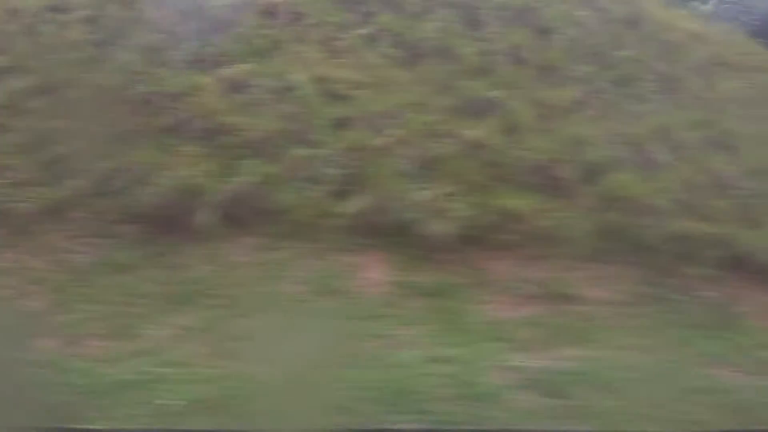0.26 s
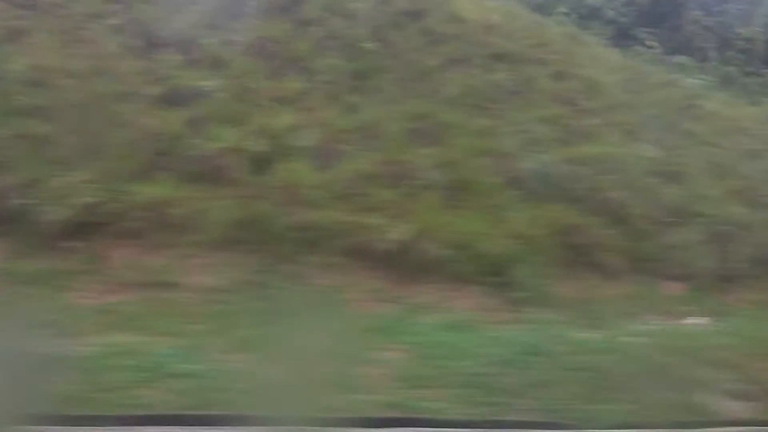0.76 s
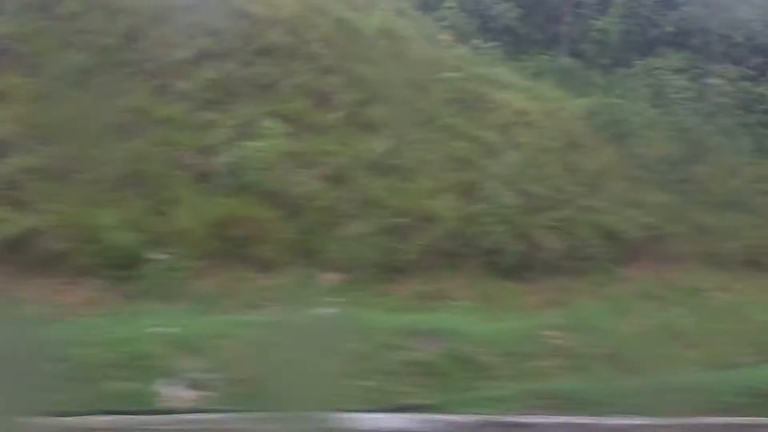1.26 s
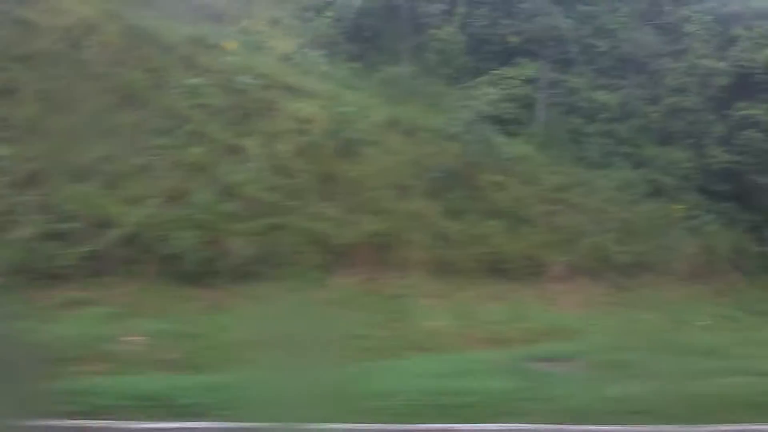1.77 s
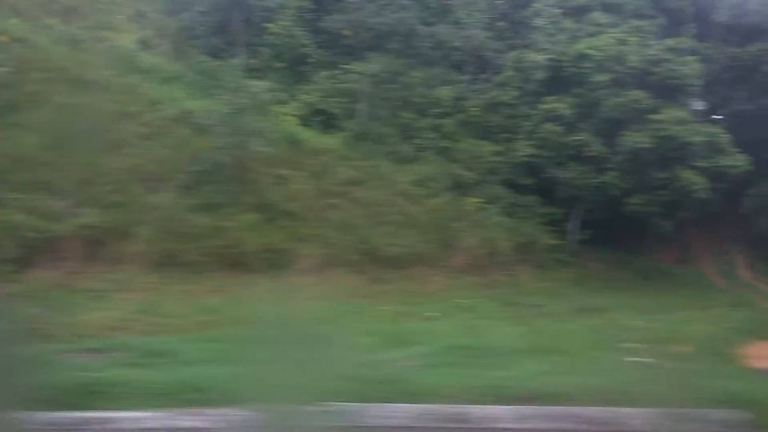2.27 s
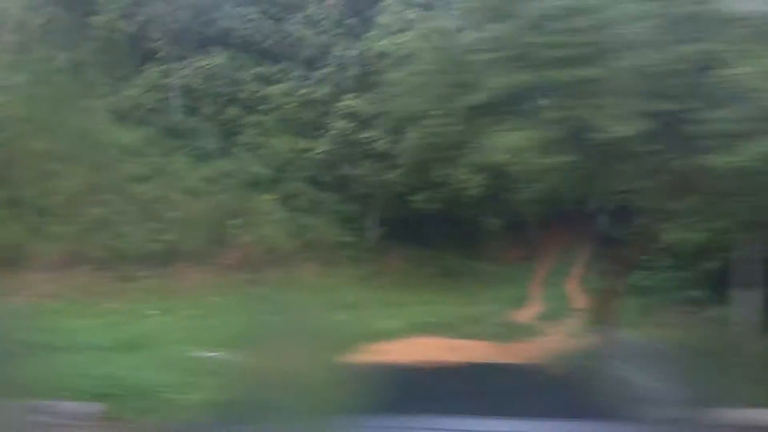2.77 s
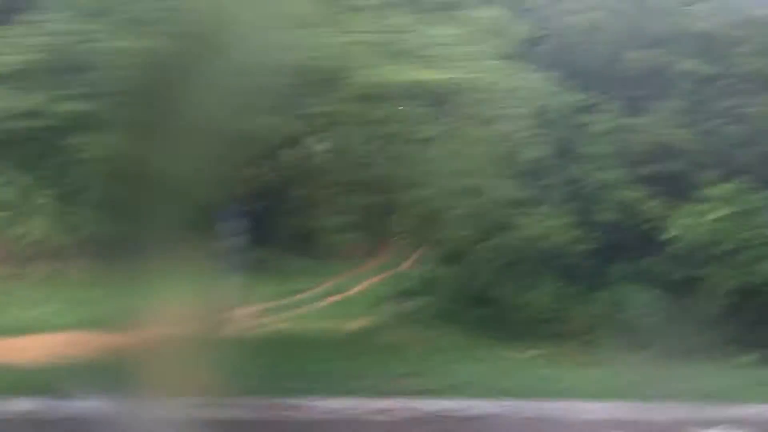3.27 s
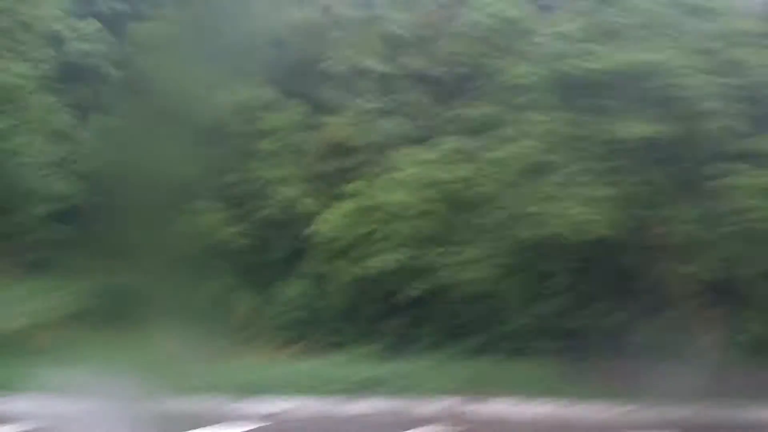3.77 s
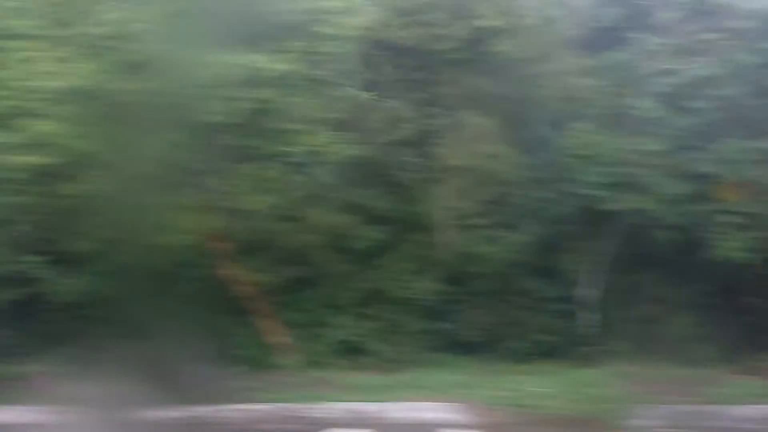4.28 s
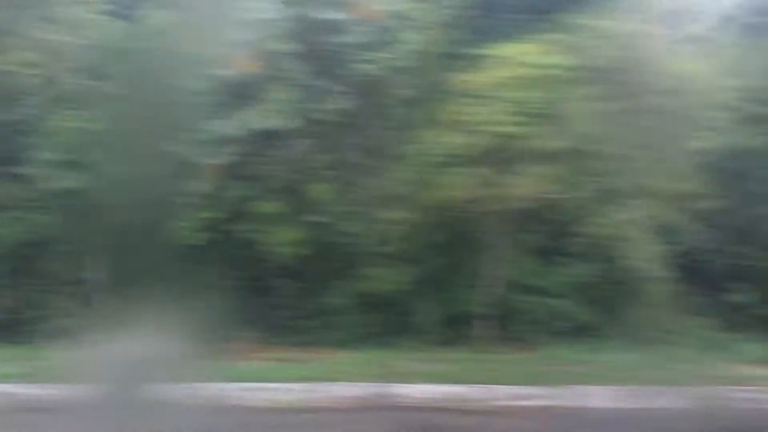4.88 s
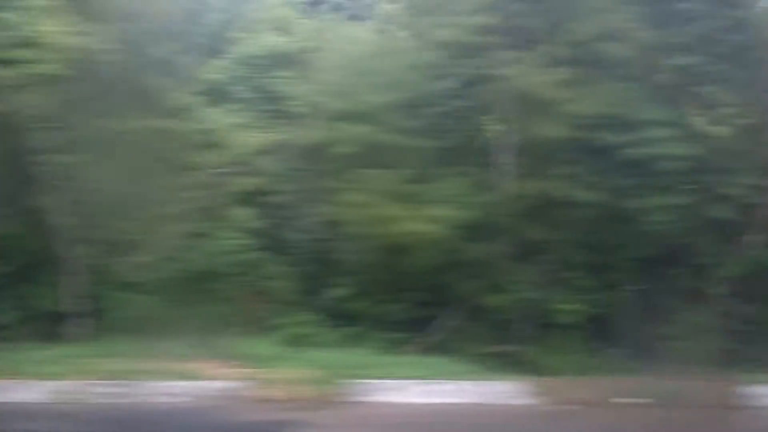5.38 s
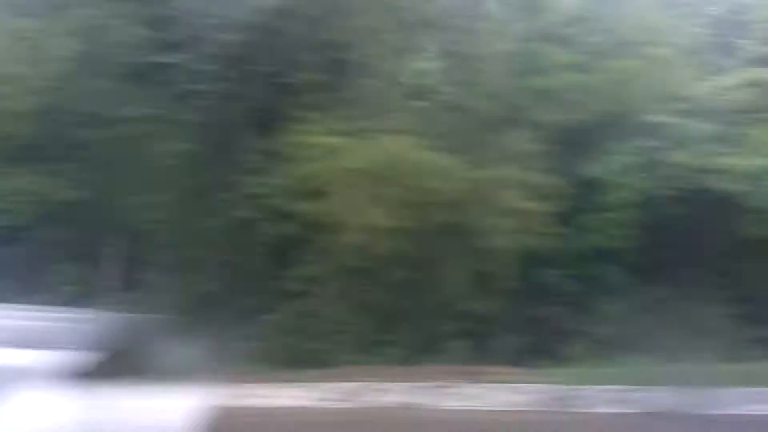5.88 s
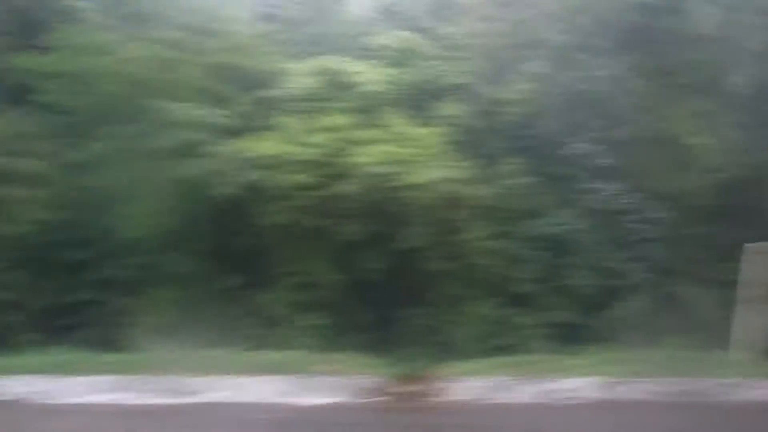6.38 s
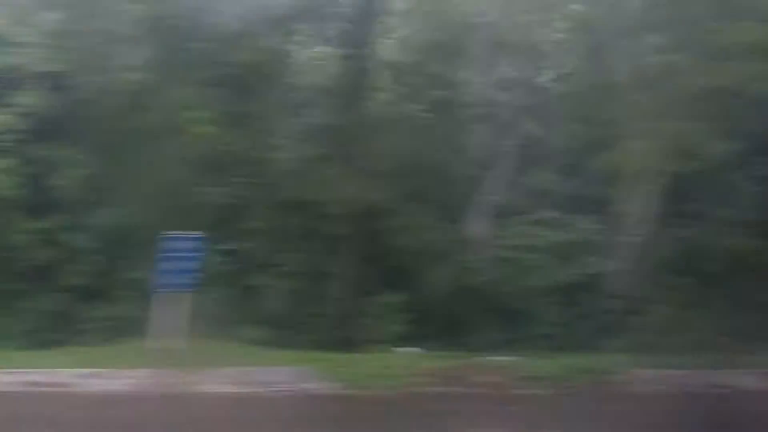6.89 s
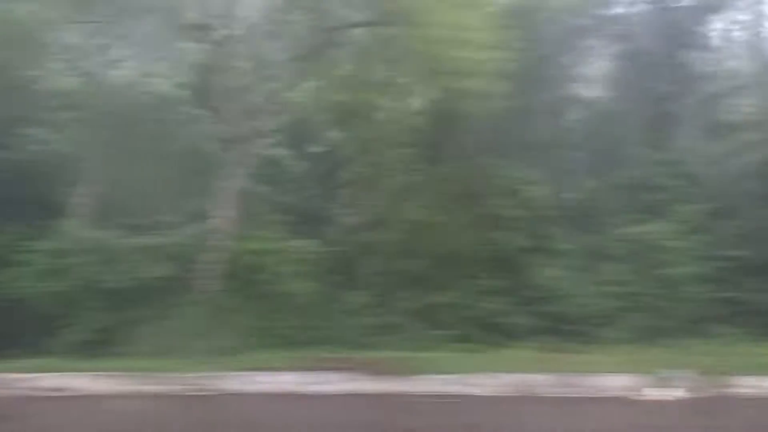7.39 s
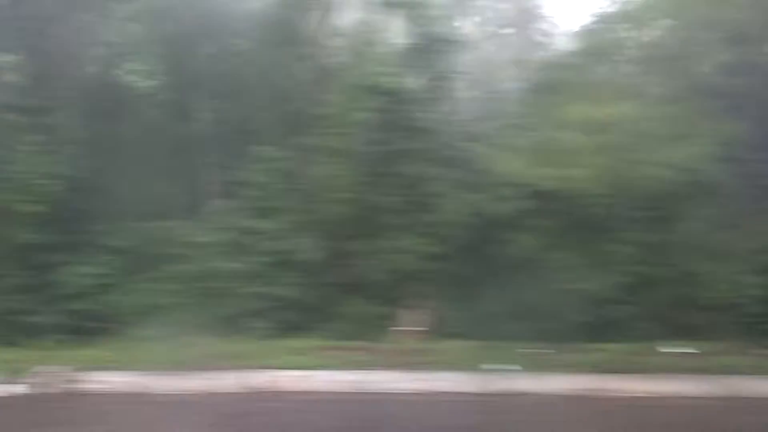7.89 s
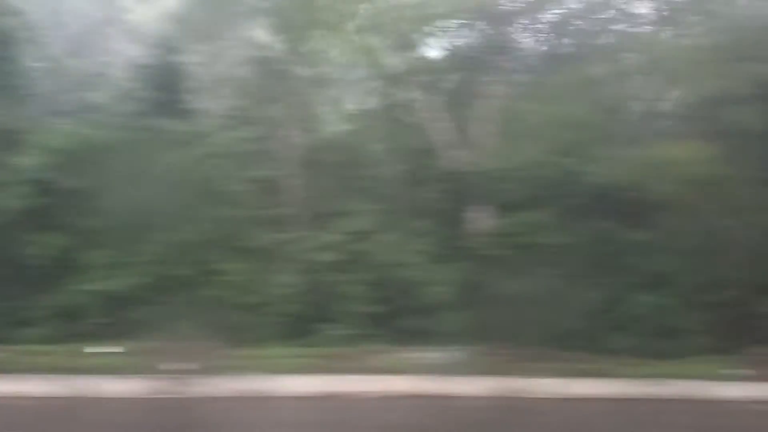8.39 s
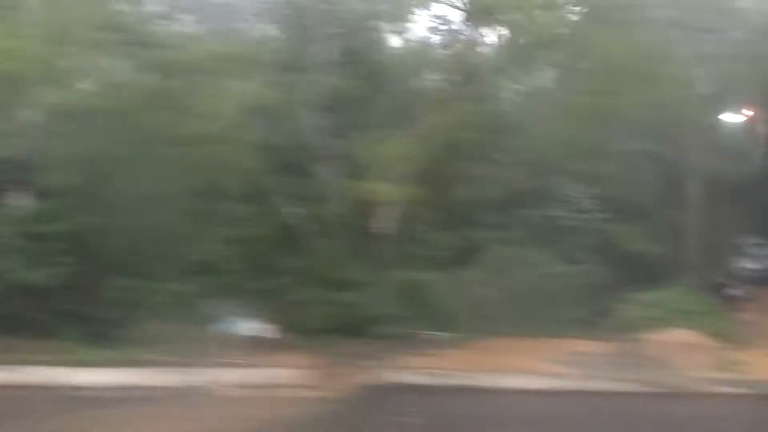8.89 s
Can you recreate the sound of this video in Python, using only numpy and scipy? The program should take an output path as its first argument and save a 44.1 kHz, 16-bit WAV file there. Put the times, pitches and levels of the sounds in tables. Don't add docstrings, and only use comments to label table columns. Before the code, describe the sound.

Steady droning cabin hum and wet tyre rush, light rain ticks on glass, bumps, spray swells, and clicks and thuds of a handheld microphone.

```python
import sys
import numpy as np
from scipy import signal
from scipy.fft import rfft, irfft, next_fast_len
from scipy.io import wavfile
from scipy.ndimage import uniform_filter1d

SR = 44100
rng = np.random.default_rng(int(sys.argv[2]) if len(sys.argv) > 2 else 0)


def digitize_waveform(pressure):
    field = np.atleast_2d(pressure).T
    bounded = np.clip(field, -1, 1)
    quanta = np.round(bounded * 32767).astype(np.int16)
    wavfile.write(sys.argv[1], SR, quanta)


def invert_db(level):
    return 10 ** (np.asarray(level, dtype=float) / 20)


N = 402633
T = np.arange(N) / SR
SIZE = next_fast_len(N)
F = np.arange(SIZE // 2 + 1) * SR / SIZE

# time in seconds, wheel turns per second.
WHEEL_SPEED = [(0, 9.82), (1, 10.05), (2, 10.22), (2.4, 10.32), (4.1, 10.32), (5, 10.4), (5.5, 10.42),
               (7, 10.56), (9.13, 10.92)]
# time in seconds, low tone in dB, high tone in dB, engine load in dB.
HUM = [(0, -26, -32, 8.5), (.3, -28, -29, 0), (1, -28.5, -37, 8.5), (1.5, -24.5, -34, 3.5),
       (2, -28, -26.5, 4), (2.5, -26.5, -25, 5), (3, -29, -30.5, 2.5), (3.5, -36.5, -34.5, -2.5),
       (4, -37, -30, -6), (4.5, -26, -36.5, -1.5), (5, -26.5, -24, 5.5), (5.5, -25.5, -22, 5.5),
       (6, -23.5, -29.5, 6), (6.5, -36.5, -25, 8), (7, -25, -26.5, 9), (7.6, -25.5, -33.5, 10.5),
       (8.5, -26, -37, 11), (9.13, -22.5, -28, 13.5)]
ORDERS = (6, 9, 11, 12, 14, 15, 16, 17, 20, 24, 30, 36)
ORDER_DB = (-48, -49, -54.5, -40.5, -40, -40.5, -37.5, -46.5, -52.5, -42.5, -51, -51)
ORDER_SWELLS = {24: [(4.8, 3), (5.3, 4), (5.85, 7), (6.45, 3), (6.9, 6), (7.2, 8), (8.1, -8), (8.7, -7)],
                36: [(3.8, 6), (5.5, 12), (5.8, 11), (7.13, 10), (7.85, 12), (8.2, 4)]}
# time in seconds, rise in dB, width in seconds.
GEAR_PEAK = (8.95, 3.2, .05)
# time in seconds, roughness in dB.
ROUGHNESS = [(0, -32.5), (.1, -34.5), (.9, -32), (1.5, -34.5), (1.9, -36.5), (2.5, -35), (2.8, -35.5),
             (3.3, -36), (4.4, -35.5), (4.8, -34), (5.45, -32), (5.7, -34.5), (6.0, -33.5), (6.7, -34),
             (7.3, -33.5), (7.7, -33), (8.3, -33.5), (9.13, -30.5)]
ROAD_CENTRES_HZ = (110, 320, 900, 4000)
# frequency in Hz, density in dB per Hz.
ROAD_COLOUR = [(25, -32.5), (60, -20.5), (130, -10), (220, -12), (400, -23), (600, -21), (1100, -30),
               (1500, -38), (2500, -43), (5000, -55.5), (8500, -53), (10500, -54), (12000, -65.5),
               (15200, -59)]
# frequency in Hz, gain in dB, width in octaves.
PANELS = [(300, 2, 0.032), (392, 4, 0.042), (500, 4, 0.034), (557, 4, 0.067), (642, 3.5, 0.039),
          (900, 3, 0.044), (1057, 3.5, 0.034), (1275, 2.5, 0.05), (2060, 2, 0.1), (4640, 1.5, 0.092),
          (5160, 3, .06)]
# frequency in Hz, shared over own in dB, left minus right in dB.
PORTS = [(40, 20, 0.5), (130, 14.5, 1.5), (320, 0.5, 0.5), (600, 5, 1), (1160, -3, 4.5), (1700, -23, -1),
         (2770, -0.5, 7), (3150, -22, 3), (3760, -13, 11), (4900, 8, -20), (5760, -40, 9), (6900, 15, -17),
         (8800, 3, 1), (12000, -23, -1)]
# frequency in Hz, level in dB.
STRAY = [(300, -23.5), (1200, -9), (2500, -29), (5000, -13), (7500, -12), (12000, 2.5)]
# time in seconds, boom in dB, share reaching the roar (0-1).
BUMPS = [(.25, 8.5, 0.24), (.71, 7.5, 0), (1.17, 5, 0.31), (1.36, 2, 0), (1.68, 6.5, 0.8), (2.63, 4, 0.7),
         (3.14, 12, 0.12), (3.48, 10, 0.19), (4.06, 5, 0.2), (4.2, 1, 0.6), (4.36, 5.5, 0), (4.73, 6, 0.04),
         (5.83, 5.5, 0.42), (6.48, 1, 0), (6.95, 4.5, 0.6), (7.53, 2.5, 0.3), (7.75, 3, 0.2),
         (7.92, 3.5, 0.8), (8.1, 1, 0.02), (8.4, 3.5, 0.02), (8.7, 0.5, 0.04), (9.05, 5, 0.36)]
# time in seconds, rise in dB.
PATCHES = [(.61, -0.5), (.91, 1), (1.09, 2), (1.56, 2.5), (1.65, 0), (1.75, 0), (2.21, 3), (2.66, 3),
           (3.18, 4.5), (4.33, 2.5), (5.28, 5), (5.77, 1.5), (6.23, 2), (6.43, 2), (7.07, 3), (7.46, 2),
           (7.66, 1.5), (7.79, 3.5), (8.02, 5), (8.21, 3.5), (8.55, 3), (8.65, 1.5), (8.87, 0)]
# time of the middle in seconds, rise in dB.
SPLASHES = [
    (.4, -2),
    (2.3, 1.5),
    (3.13, 3.5),
    (3.5, 2),
    (4.4, 1.5),
    (5.85, 0.5),
    (6.45, 2),
    (6.79, 2),
    (7.62, -0.5),
    (8.95, 1),
]
# time in seconds, rise in dB, width in seconds, centre in Hz.
WET_STRETCH = (5.83, 2.8, 0.72, 2540)
# start in seconds, peak in dB.
DROPS = [(0.2994, -35), (0.348, -37), (0.68, -35), (1.0301, -42), (1.608, -41), (1.6455, -36), (2.814, -40),
         (3.1213, -37), (3.2545, -40), (3.4416, -38), (3.4855, -45), (3.5644, -38), (3.6596, -42),
         (4.5024, -36), (4.5296, -41), (4.569, -40), (4.9707, -45), (4.997, -40.5), (5.0843, -51),
         (5.337, -44), (5.7982, -41), (5.91, -45), (6.54, -49), (6.8733, -44), (6.9955, -41), (7.0976, -32),
         (7.7554, -44), (8.0835, -37), (8.2078, -37), (8.993, -38)]
# start in seconds, peak in dB.
PATTER = [(4.6118, -46), (4.6951, -47), (4.7101, -45), (4.7505, -51), (4.7904, -47), (4.8602, -51),
          (4.9251, -43), (4.95, -43), (4.97, -42), (4.9969, -42), (5.0757, -44), (5.0842, -41),
          (5.1052, -43), (5.2603, -42), (5.3357, -43), (5.401, -41), (5.4299, -43), (5.4833, -44),
          (5.5991, -57), (5.7407, -50), (5.7981, -46), (5.861, -43), (5.8949, -47), (5.9104, -42),
          (5.9902, -46), (6.045, -44), (6.061, -41), (6.2301, -50)]
# start in seconds, peak in dB.
SCATTERED_DROPS = [(0.0453, -44), (0.4733, -46), (0.7402, -42), (1.0046, -46), (1.284, -45), (2.0612, -45),
                   (2.5406, -44), (2.7137, -45), (3.0525, -44), (3.3877, -42), (3.8511, -45), (4.369, -43),
                   (6.5909, -47), (6.776, -47), (6.8104, -43), (6.8453, -41), (6.8543, -39), (6.9501, -43),
                   (7.5612, -41), (7.9154, -41), (8.0112, -43), (8.1549, -41), (8.2771, -46), (8.308, -43),
                   (8.3409, -43), (8.3903, -43), (8.5679, -41), (8.6213, -46), (8.7246, -42), (8.774, -43),
                   (8.9494, -41), (9.0818, -44), (9.1102, -41)]
# start in seconds, peak in dB, treble against peak in dB, hollow body in dB.
TICKS = [(0.299, -11.5, -25, -20), (0.338, -41, -22, 0), (0.3479, -16.5, -21, -4), (1.1882, -37, -19, -1),
         (1.61, -42, -2, -6), (1.6455, -34, -14, -1), (1.647, -32.5, -6, 2), (1.649, -36, -18, -7),
         (1.736, -38, -10, 0), (3.215, -39, -22, -1), (3.4206, -45, -14, 2), (3.4865, -31, -15, 2.5),
         (3.634, -39, -11, 0), (3.6609, -22, -23, 2.5), (3.674, -32.5, -20, 1), (3.7718, -40.5, -19, 1),
         (3.8213, -24.5, -43, 4), (3.9265, -36, -18, 6), (3.93, -29.5, -17, -3.5), (3.8686, -36, -26, -5),
         (1.1702, -39, -25, -5), (3.1038, -40, -18, 0), (3.1916, -37, -20, -2), (3.4037, -44, -20, -4),
         (3.5957, -42, -20, -5), (1.719, -41, -18, 2), (4.4997, -42, -18, -4), (4.5306, -28.5, -18, 0),
         (3.8179, -33, -20, 5), (3.832, -30, -20, -9), (4.527, -33.5, -18, 2), (4.5317, -28, -25, -2),
         (6.523, -36, -14, -6), (3.549, -45, -11, 3), (6.5406, -27.5, -15, -3), (6.5428, -39, -20, 10),
         (6.5597, -33, -28, -3), (6.9122, -22.5, -24, -3), (7.7553, -41, -2.5, -8), (8.7024, -43, -10, 0),
         (8.726, -46, -8, -3), (8.916, -41.5, -8, -4), (8.993, -36.5, -1.5, 6), ]
# frequency in Hz, level in dB, t60 in seconds.
TICK_MODES = [(1340, -3.5, 0.0095), (2330, 7.5, 0.0029), (3780, 7, 0.00041), (4160, 1.5, 0.00092)]
# frequency in Hz, level in dB, t60 in seconds.
CRACK_MODES = [(6200, -4, 0.00074), (8300, 1, 0.0008), (12100, -6, .001)]
# start in seconds, peak in dB.
LIGHT_TOUCHES = [
    (0.2118, -33),
    (0.6325, -36),
    (0.9013, -36),
    (2.6737, -34),
    (4.1584, -37),
    (4.323, -30),
    (4.7813, -33),
    (6.3163, -33),
]
# start in seconds, peak in dB, frequency in Hz.
THUMPS = [(.3, -21, 150), (.43, -16, 500), (.607, -19, 500), (3.774, -26, 500), (8.246, -9.5, 430),
          (1.526, -9, 200), (1.561, -13, 250), (1.605, -26, 151), (1.642, -5, 130), (3.125, -29, 110),
          (3.216, -22, 250), (3.486, -16, 400), (3.660, -14, 400), (3.673, -15, 300), (.347, -12, 450),
          (6.911, -14, 450), (3.821, -4.5, 177), (3.931, -15, 200), (4.529, -12, 110), (6.542, -10, 410),
          (3.926, -23, 500)]
# start in seconds, length in seconds, level in dB, treble against level in dB.
SCUFFS = [(0.302, 0.021, -44, 0), (0.669, 0.023, -40, 3), (0.74, 0.012, -45, 2), (1.033, 0.12, -46.5, 7.5),
          (1.606, 0.031, -39, 4), (1.643, 0.0096, -26.5, -2), (1.659, 0.026, -42, 2),
          (1.734, 0.022, -38, 2), (2.556, 0.23, -54, 2.5), (3.12, 0.024, -44.5, 5.5),
          (3.255, 0.013, -44, 5.5), (3.418, .02, -46, -6), (3.442, .015, -42, 3), (3.564, 0.017, -43, 2),
          (3.668, 0.0065, -39, 0), (3.773, .012, -39, -1), (3.783, 0.096, -45, 5), (3.817, 0.0099, -30, -4),
          (3.923, 0.008, -39, 0), (4.5, 0.023, -39, 0), (4.531, 0.022, -43, -4), (4.572, .02, -48, 6),
          (6.773, 0.081, -43, -3), (6.977, 0.052, -32.5, -1.5), (6.986, 0.028, -30.5, 2.5),
          (7.098, 0.014, -49, 4), (7.577, 0.14, -43.5, 7), (7.624, .07, -45, 4), (7.924, 0.21, -49, 6),
          (8.079, 0.021, -47, 6), (8.212, 0.043, -48, 2), (8.766, 0.12, -44.5, 6), (8.808, .07, -44.5, 6),
          (8.993, 0.002, -40, 3)]
# from Hz, to Hz.
SCUFF_BANDS_HZ = [(2300, 3800), (5300, 10000)]
RUB_BANDS_HZ = [(3200, 5000), (5400, 9200)]
# frequency in Hz, level in dB.
WHINE = [(9000, -74), (11000, -80), (13000, -58), (14000, -69), (15000, -57.5)]
BUSY_AT_S = (.02, .43, 1.0, 1.1, 1.27, 2.03, 4.69, 4.92, 5.0, 5.08, 5.38, 5.6, 5.79, 5.89, 6.03, 6.31, 6.83,
             7.21, 8.31, 8.91, 9.01)
# frequency in Hz, gain in dB.
LEFT_DULL = [(7000, -1), (9000, -4), (10500, -16), (13000, -23), (15000, -42)]
# step time in seconds, step in dB.
DUCK = [
    (0.307, -7),
    (9.028, -6),
]

BOOM_ORDER, GEAR_ORDER, FADING_ORDER = 18, 47.4, 30
FADING_DB, FADING_S = 12.5, 1
SLIP_HZ, SLIP_START_TURNS, SLIP_RISE_HZ_PER_S, PULL_S = 3.86, -.12, .09, 4.2
GEAR_DB, GEAR_RISE_DB_PER_S, GEAR_FLUTTER_DB, GEAR_WOBBLE_RAD = -49, 1.5, 2.2, .7
ORDERS_PER_LOAD, RUMBLE_PER_LOAD, BOOM_PER_LOAD = 0.43, 0.28, 0.039
SWELL_S, BUMP_S, PATCH_S, SPLASH_S = 0.055, 0.091, 0.02, 0.098
ROAD_DB, STRAY_WANDER_DB = -25, 7
PORT_DELAY_S, FRONT_LAG_S, ROAD_LAG_S, CROSS = 4e-4, 0.00018, 3e-5, 0.81
SHELL_SHARE = 0.51
SPATTER_DB, SPATTER_S = -8.5, 0.011
BODY_DB, BODY_SCATTER_DB, HARD_SNAP_DB = -3.5, -3.5, -29
SNAP_DETUNE, SNAP_SCATTER_DB = .06, 1.2
TOUCH_HZ, TOUCH_T60_S = 4200, 0.0095
FLICK_S, RUB_S = .04, .06
FRAME_RATE_HZ, BUSY_S = 25.02, .12
DUCK_ATTACK_S, DUCK_RELEASE_S = 0.0028, 0.54
TOP_HZ, HISS_FROM_HZ, HISS_DB = 15150, 9500, -65


def curves(table):
    s, *columns = np.transpose(table)
    return [np.interp(T, s, c) for c in columns]


def colour(table):
    hz, *columns = np.transpose(table)
    return [np.interp(np.log(F + 1), np.log(hz), c) for c in columns]


def walk(rate_hz):
    count = int(N / SR * rate_hz) + 2
    return 0.73 * np.interp(T * rate_hz, np.arange(count), rng.standard_normal(count))


def swells(times_s, heights_db, width_s):
    return sum(h * np.exp(-.5 * ((T - s) / width_s) ** 2) for s, h in zip(times_s, heights_db))


def band(hz, octaves):
    return np.exp(-.5 * (np.log2((F + 1) / hz) / octaves) ** 2)


def bandpass(order, edges_hz, noise):
    return signal.sosfilt(signal.butter(order, edges_hz, "band", fs=SR, output="sos"), noise)


def delay(s):
    return np.exp(-2j * np.pi * F * s)


def ring(hz, t60_s):
    t = np.arange(int(t60_s * SR)) / SR
    return -np.sin(2 * np.pi * hz * t) * np.exp(-np.log(1000) * t / t60_s)


def add(out, s, piece):
    i = int(s * SR)
    out[i:i + len(piece)] += piece[:N - i]


def aim(ports):
    return ports - CROSS * delay(PORT_DELAY_S) * ports[::-1]


def touch(sound):
    ports = np.array([rfft(sound, SIZE), 0 * F])
    return aim(ports) + SHELL_SHARE * ports * band(6600, .55)


def whine(roar_db):
    on = ((T * FRAME_RATE_HZ + .08) % 1 < .2) * invert_db(-5.0 + 5.0 * walk(12))
    for start in BUSY_AT_S:
        on[int(start * SR):int((start + BUSY_S) * SR)] = 1
    tones = sum(invert_db(db) * np.sin(2 * np.pi * hz * T) for hz, db in WHINE)
    channel_gain = invert_db([[-21.0], [3.0]])
    return uniform_filter1d(on, size=150) * tones * invert_db(roar_db) * channel_gain


def handling():
    out, flicks = np.zeros((2, N))
    for s, db, hz in THUMPS:
        swing = ring(hz, 1.9 / hz)
        contact = np.minimum(np.arange(len(swing)) * hz / (.8 * SR), 1)
        add(out, s, invert_db(db + 20.5) * swing * contact)
    for s, length_s, db, treble_db in SCUFFS:
        t = np.arange(int((length_s + 0.03) * SR)) / SR
        shape = np.minimum(t / (0.1 * length_s), 1) * np.exp(-(t / length_s) ** 4)
        grain = invert_db(2.5 * uniform_filter1d(rng.standard_normal(len(t)), size=40) * np.sqrt(40))
        rub = rng.standard_normal(len(t))
        bands_hz = SCUFF_BANDS_HZ if length_s < RUB_S else RUB_BANDS_HZ
        low, high = (bandpass(2, edges_hz, rub) for edges_hz in bands_hz)
        track = flicks if length_s < FLICK_S else out
        add(track, s, invert_db(db) * shape * grain * (2.0 * low + invert_db(treble_db) * high))
    return aim(np.array([rfft(out, SIZE), 0 * F])) + touch(flicks)


def ticks():
    out = np.zeros(N)
    for s, peak_db, treble_db, hollow_db in TICKS:
        body_db = min(peak_db, HARD_SNAP_DB) + hollow_db + BODY_DB
        body_db += BODY_SCATTER_DB * rng.standard_normal()
        for k, (hz, db, t60_s) in enumerate(TICK_MODES):
            detune, scatter = rng.standard_normal(2)
            db = db + .6 * (2.4 - k) * min(peak_db + 30, 0)
            mode_db = peak_db + db + (k == 0) * hollow_db + 5.0 + SNAP_SCATTER_DB * scatter
            add(out, s + 6e-5 * k, invert_db(mode_db) * ring(hz * (1 + SNAP_DETUNE * detune), t60_s))
        body_hz = 560 * (1 + 0.24 * rng.standard_normal())
        add(out, s + 0.00015, -invert_db(body_db + 22.5) * ring(body_hz, 0.0078))
        for hz, db, t60_s in CRACK_MODES:
            crack_hz = hz * (1 + SNAP_DETUNE * rng.standard_normal())
            add(out, s, invert_db(peak_db + treble_db + db + 22.0) * ring(crack_hz, t60_s))
    for s, db in LIGHT_TOUCHES:
        add(out, s, invert_db(db) * ring(TOUCH_HZ, TOUCH_T60_S))
    return touch(out)


def rain(rate_hz=300, level_db=-48, spread_db=4.5):
    when, size, port = rng.random((int(rate_hz * N / SR), 3)).T
    hits = np.zeros((2, N))
    hits[(port > .5) * 1, (when * N).astype(int)] = invert_db(level_db - spread_db * np.log(1.01 - size))
    left, right = near = np.zeros((2, N))
    for s, db in DROPS:
        add(right, s, invert_db(db + 6.5) * ring(9800 * (1 + 0.079 * rng.standard_normal()), 0.0085))
        add(left, s, invert_db(db + 4.0) * ring(7500 * (1 + 0.057 * rng.standard_normal()), 0.0066))
    fizz = bandpass(2, [8000, 14000], rng.standard_normal((len(DROPS), 2000)))
    for (s, db), noise in zip(DROPS, fizz):
        decay = np.exp(-np.arange(len(noise)) / (SPATTER_S * SR))
        add(right, s, invert_db(db + SPATTER_DB + 9.5) * noise * decay)
    for (s, db), pitch in zip(PATTER, rng.random(len(PATTER))):
        add(right, s, invert_db(db + 9.5) * ring(9400 + 1000 * pitch, 0.0055))
    for (s, db), pitch in zip(SCATTERED_DROPS, rng.random(len(SCATTERED_DROPS))):
        add(right, s, invert_db(db + 8.5) * ring(9400 + 1500 * pitch, 0.004))
    return aim(rfft(hits, SIZE) * band(9500, 1.0) + rfft(near, SIZE))


def surface():
    s, bump_db, share = np.transpose(BUMPS)
    load_db = curves(HUM)[2]
    patch_db = swells(*np.transpose(PATCHES), PATCH_S)
    common_db = curves(ROUGHNESS)[0] + swells(s, bump_db * share, BUMP_S)
    boom_db = swells(s, bump_db * (1 - share), BUMP_S) + BOOM_PER_LOAD * load_db
    rumble_db = RUMBLE_PER_LOAD * load_db + 0.47 * patch_db
    spray_db = swells(*np.transpose(SPLASHES), SPLASH_S)
    levels_db = common_db + np.array([boom_db, rumble_db, patch_db, spray_db])
    return levels_db - levels_db.mean(axis=1, keepdims=True)


def road_at_ports():
    shared_db, left_db = colour(PORTS)
    shared, own_left, own_right = rfft(rng.standard_normal((3, SIZE)))
    common = invert_db(shared_db) * shared
    left = invert_db(left_db / 2) * (common * delay(ROAD_LAG_S) + own_left)
    right = invert_db(-left_db / 2) * (common + own_right)
    heard = aim(np.array([left, right]))
    mean_power = uniform_filter1d(np.mean(np.abs(heard) ** 2, axis=0), size=301)
    stray = rfft(rng.standard_normal((2, N)) * invert_db(STRAY_WANDER_DB * walk(9)), SIZE)
    stray = stray / np.sqrt(SIZE) * invert_db(colour(STRAY)[0])
    panels_db = sum(db * band(hz, octaves) for hz, db, octaves in PANELS)
    return (heard / np.sqrt(mean_power) + stray) * invert_db(colour(ROAD_COLOUR)[0] + panels_db)


def road(levels_db):
    heard = road_at_ports()
    centres_hz = 28 * 2 ** np.arange(0, 9.7, .6)
    bells = np.array([band(hz, .3) for hz in centres_hz])
    wet_s, wet_db, wet_width_s, wet_hz = WET_STRETCH
    jolts = walk(13)
    out = 0
    for hz, bell in zip(centres_hz, bells / bells.sum(axis=0)):
        log_hz = np.log(hz)
        weights = [np.interp(log_hz, np.log(ROAD_CENTRES_HZ), row) for row in np.eye(4)]
        flicker_db = np.interp(log_hz, np.log([800, 5000, 12000]), [1.4, 2.0, 3.6]) * walk(14)
        flicker_db += swells([wet_s], [wet_db], wet_width_s) * np.exp(-3 * np.log2(hz / wet_hz) ** 2)
        flicker_db += np.interp(log_hz, np.log([100, 400, 2000]), [.4, 1.0, .7]) * jolts
        out = out + invert_db(weights @ levels_db + flicker_db) * irfft(heard * bell, SIZE)[:, :N]
    return rfft(out * invert_db(ROAD_DB) / out.std(), SIZE)


def drivetrain():
    turn = 2 * np.pi * np.cumsum(curves(WHEEL_SPEED)[0]) / SR
    low_db, high_db, load_db = curves(HUM)
    beats = SLIP_START_TURNS + SLIP_HZ * T + SLIP_RISE_HZ_PER_S * (T - PULL_S).clip(0) ** 2 / 2
    out = invert_db(low_db) * np.sin(BOOM_ORDER * turn)
    out -= invert_db(high_db) * np.sin(BOOM_ORDER * turn + 2 * np.pi * beats)
    peak_s, peak_db, width_s = GEAR_PEAK
    gear_db = GEAR_DB + 1.366 * load_db + GEAR_RISE_DB_PER_S * (T - PULL_S).clip(-2, 1)
    gear_db += swells([peak_s], [peak_db], width_s) + GEAR_FLUTTER_DB * walk(20)
    out += invert_db(gear_db) * np.sin(GEAR_ORDER * turn + GEAR_WOBBLE_RAD * walk(16))
    for k, db in zip(ORDERS, ORDER_DB):
        level_db = db + swells(*np.transpose(ORDER_SWELLS.get(k, [(0, 0)])), SWELL_S)
        level_db = level_db + ORDERS_PER_LOAD * load_db + 2.6 * walk(2.948)
        if k == FADING_ORDER:
            level_db = level_db + FADING_DB * np.exp(-T / FADING_S)
        phase = 2 * np.pi * rng.random() + 0.018 * k * walk(5)
        out += invert_db(level_db) * np.sin(k * turn + phase)
    sound = rfft(out, SIZE)
    lift = 1 / np.abs(1 - CROSS * delay(PORT_DELAY_S)).clip(.2, 1)
    return aim(np.array([sound * delay(FRONT_LAG_S), sound])) * lift * invert_db(2.5)


def scene():
    dull_db = colour(LEFT_DULL)[0] * np.array([[1], [0]])
    levels_db = surface()
    sound = (drivetrain() + road(levels_db) + rain() + handling()) * invert_db(dull_db)
    sound = sound + ticks() * invert_db(0.56 * dull_db)
    return irfft(sound, SIZE)[:, :N] + whine(levels_db[2])


def top_cut(x):
    return signal.sosfilt(signal.butter(12, 16510, fs=SR, output="sos"), x)


def record(dry):
    cut = signal.sosfilt(signal.ellip(7, .3, 42, TOP_HZ, fs=SR, output="sos"), dry)
    gain_db = 0
    for s, db in DUCK:
        attack = ((T - s) / DUCK_ATTACK_S).clip(0, 1)
        gain_db = gain_db + db * attack * np.exp(-(T - s).clip(0) / DUCK_RELEASE_S)
    hiss = bandpass(4, [HISS_FROM_HZ, TOP_HZ], rng.standard_normal(N))
    hiss = hiss * invert_db(HISS_DB) * np.array([[.2], [1]])
    mix = np.clip(cut * invert_db(gain_db) + hiss, -1, 1)
    return top_cut(mix)


dry = scene()
out = record(dry)
digitize_waveform(out)
```